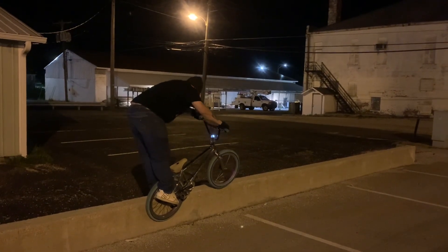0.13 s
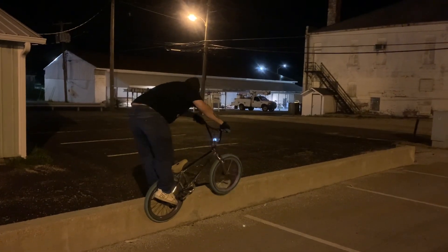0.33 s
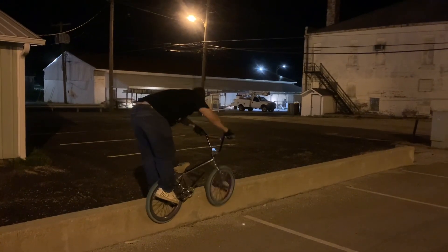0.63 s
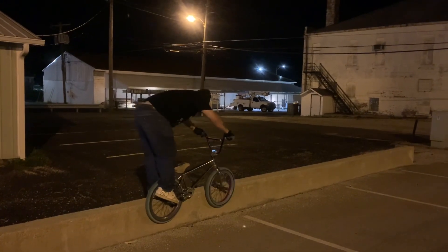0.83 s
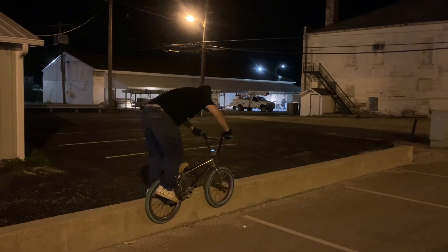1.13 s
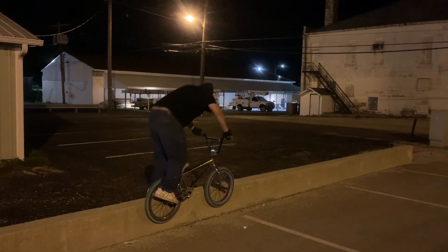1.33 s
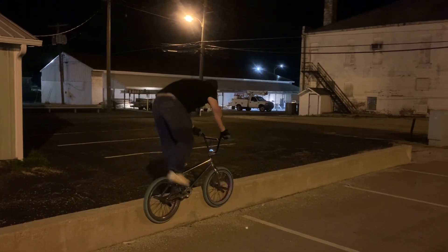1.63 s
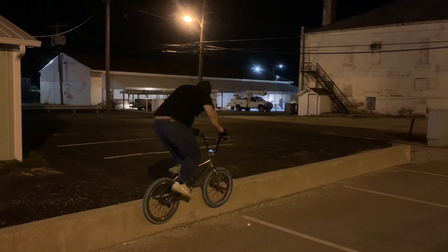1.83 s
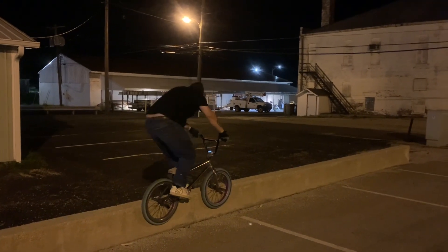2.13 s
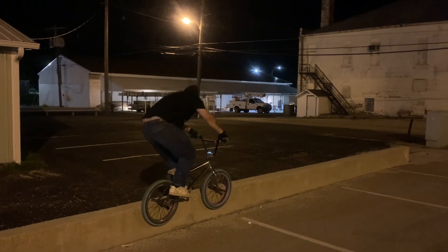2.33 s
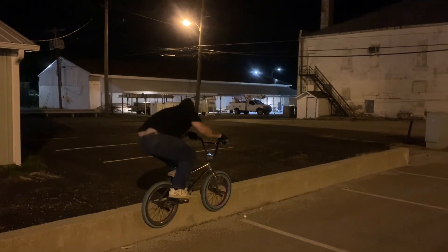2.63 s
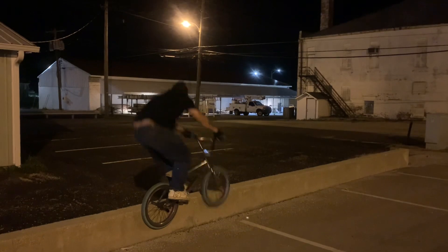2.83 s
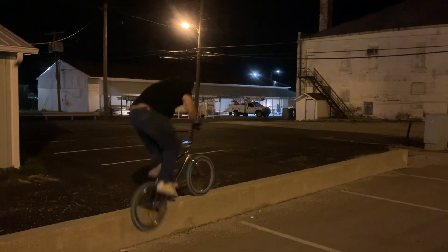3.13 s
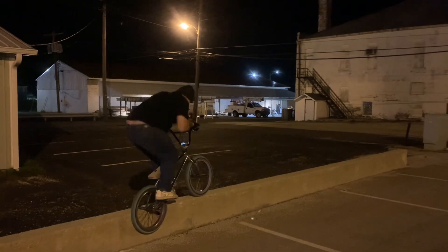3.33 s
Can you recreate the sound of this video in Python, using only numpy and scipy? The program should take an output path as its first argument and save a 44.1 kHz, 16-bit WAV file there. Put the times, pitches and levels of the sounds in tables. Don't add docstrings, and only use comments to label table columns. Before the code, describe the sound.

A small steel bike hops on a concrete curb outdoors at night: a sharp double knock, smaller clacks, another crack, then a hard ringing landing. Close stereo microphone, faint building echoes, low distant traffic.

```python
import sys
import numpy as np
from scipy import signal
from scipy.fft import rfft, irfft, next_fast_len
from scipy.io import wavfile

SR = 44100
rng = np.random.default_rng(int(sys.argv[2]) if len(sys.argv) > 2 else 0)


def undo_db(level):
    steps = np.asarray(level, float) / 20
    return 10 ** steps


def output_pcm(signal):
    pcm = np.clip(np.atleast_2d(signal).T, -1, 1) * 32767
    wavfile.write(sys.argv[1], SR, np.round(pcm).astype(np.int16))


N = 154350
T = np.arange(N) / SR


def clacks():
    # t/s, peak level/dB, pitch of the struck part f/Hz, rattle's time to fall 60 dB t60/s
    clack_events = [(0.0928, -58.5, 2230, 0.024), (0.5756, -33, 2530, 0.012), (0.5887, -28, 2440, 0.072),
                    (0.6695, -23.5, 2330, 0.042), (0.6754, -33, 2340, 0.035), (0.7057, -37, 2100, 0.09),
                    (0.7464, -55.5, 2060, 0.057), (0.778, -49, 2090, 0.012), (0.894, -45.5, 10900, 0.032),
                    (0.9244, -30, 9170, 0.027), (0.9552, -50.5, 3630, 0.043), (1.1895, -51.5, 10500, 0.26),
                    (1.365, -51.5, 1980, 0.17), (1.4615, -30.5, 2240, 0.029), (1.4794, -64, 1950, 0.054),
                    (1.5535, -46, 2170, 0.079), (1.587, -39, 9700, 0.07), (1.7144, -36.5, 10600, 0.042),
                    (1.724, -19.5, 10600, 0.0088), (1.7607, -34.5, 10900, 0.2),
                    (1.8593, -42.5, 11200, 0.047), (2.2044, -58.5, 1980, 0.034), (2.3375, -55, 2190, 0.06),
                    (2.7837, -58, 2220, 0.076), (2.9484, -42, 7350, 0.016), (3.0405, -29, 2540, 0.012),
                    (3.1223, -25.5, 2720, 0.017), (3.1567, -16.5, 10100, 0.083),
                    (3.1722, -13.5, 10600, 0.0078), (3.3404, -62, 2870, 0.05)]
    # f/Hz, level/dB
    crack_spectrum = [(600, -28), (1500, 2), (2500, 5.5), (4800, -1.5), (7000, -3), (10500, 3), (15000, -3),
                      (16000, -19)]
    crack, rattle, pings = np.zeros(N), np.zeros(N), np.zeros(N)
    for s, db, hz, t60 in clack_events:
        crack += undo_db(db - 2) * shape(s, attack=0.0012, hold=0.00055, t60=0.017)
        rattle += undo_db(db - 13.5) * shape(s, attack=0.003, hold=0.0088, t60=t60)
        ping_t60 = min(0.012, 69 / hz)
        pings += tap(s, db + 10, hz, ping_t60)
    noise = crack * rng.standard_normal(N) + rattle * grains()
    return colour(noise, crack_spectrum) + pings


def knocks():
    # t/s, peak level/dB, pitch f/Hz, time to fall 60 dB t60/s
    knock_events = [(0.575, -39, 740, 0.066), (0.67, -14, 1443, 0.02), (0.704, -37.5, 838, 0.041),
                    (0.735, -32.5, 1304, 0.058), (0.803, -52, 890, 0.068), (0.85, -46.5, 1440, 0.065),
                    (0.924, -39.5, 1174, 0.055), (1.46, -30.5, 1790, 0.11), (1.554, -39.5, 1390, 0.028),
                    (1.602, -32, 1480, 0.012), (1.7128, -27.5, 1170, 0.031), (1.724, -22.5, 817, 0.028),
                    (1.7605, -17.5, 1400, 0.008), (1.875, -41, 810, 0.019), (1.908, -53, 760, 0.04),
                    (2.337, -38, 1195, 0.033), (2.665, -44.5, 1390, 0.017), (2.843, -29, 1560, 0.019),
                    (3.04, -28.5, 1200, 0.011), (3.123, -22, 1280, 0.017), (3.157, -19, 1074, 0.019),
                    (3.171, -16.5, 780, 0.017), (3.199, -40, 740, 0.13), (0.576, -6, 2990, 0.014),
                    (0.591, -34, 2700, 0.017), (0.591, -44.5, 6270, 0.018), (0.605, -34.5, 2640, 0.023),
                    (0.7, -32.5, 4140, 0.045), (0.7, -38, 7450, 0.1), (0.716, -37, 2040, 0.045),
                    (0.75, -35, 2050, 0.064), (0.9255, -31, 6240, 0.018), (0.899, -55, 3870, 0.06),
                    (0.955, -32.5, 3580, .03), (1.47, -31, 2030, 0.088), (1.7255, -19, 6520, 0.02),
                    (1.726, -22.5, 2260, .015), (2.845, -39, 2490, .015), (2.866, -43.5, 2550, .02),
                    (2.951, -56, 6700, 0.11), (2.982, -51, 7000, .02), (3.339, -33, 2420, 0.024),
                    (3.358, -35, 2590, 0.037), (3.375, -45, 2300, .03), (3.215, -29, 1770, 0.033),
                    (3.185, -25, 1600, 0.044), (0.672, -26.5, 820, 0.026), (0.679, -24.5, 1640, 0.024),
                    (1.49, -40, 2050, 0.25), (0.669, -24.5, 6360, 0.016), (0.5765, -40, 3570, .012),
                    (1.731, -25.5, 400, 0.015), (0.896, -37, 11050, 0.028)]
    total = np.zeros(N)
    for s, db, hz, t60 in knock_events:
        total += shape(s, attack=1.6 / hz, hold=1, t60=1) * tap(s, db + 2, hz, t60)
    return total


def landing():
    # f/Hz, level/dB, time to fall 60 dB t60/s
    tube_modes = [(2941, -2.5, .42), (6972, -4, .27), (7316, -7, .26), (7361, -14, .22), (8096, -20, .25),
                  (9189, -12, .33), (9269, -15, .3), (9986, -8, .08), (10534, -6, .2), (10605, -15, .2),
                  (10800, -10, .12), (12250, -13, .15), (15257, -15, .15), (11094, -13, .12)]
    landing_s, landing_db = 3.173, -22
    click = np.zeros(N)
    click[int(landing_s * SR)] = undo_db(landing_db)
    total = np.zeros(N)
    for hz, db, t60 in tube_modes:
        swell = shape(landing_s, attack=(950 / hz) ** 2, hold=1, t60=1)
        waver = undo_db(db + 1.5 * drift(30))
        total += waver * swell * ring(click, hz, t60)
    return total


def thuds():
    # t/s, peak level/dB, pitch f/Hz, time to fall 60 dB t60/s
    thud_events = [(0.267, -32.5, 112.6, 0.3), (0.301, -25.5, 65, 0.11), (0.579, -29.5, 102.6, 0.12),
                   (0.671, -17.5, 248, 0.12), (.795, -45, 348, 0.49), (1.1, -38.5, 290, 0.12),
                   (1.727, -22.5, 205.2, 0.051), (1.954, -34, 69.4, 0.073), (2.422, -39.5, 117.4, 1),
                   (3.136, -25, 106.1, 0.31), (3.166, -24, 96.45, 0.57), (3.168, -20, 199.3, 0.22),
                   (3.158, -24, 306, 0.025), (.682, -29.5, 149.7, 0.16), (3.3, -43.5, 600, .2)]
    total = np.zeros(N)
    for s, db, hz, t60 in thud_events:
        phase = 2 * np.pi * hz * (T - s) + 0.58 * drift(37)
        boom = shape(s, attack=0.62 / hz, hold=0.85 / hz, t60=t60) * np.sin(phase)
        narrow = resonate(rng.standard_normal(N), hz, 0.3 * hz)
        dull = resonate(narrow, 0.37 * hz, 3.3 * hz)
        puff = 0.27 * shape(s, attack=0.017, hold=0.013, t60=0.17) * dull
        total += undo_db(db) * (boom + puff)
    return total


def scrapes():
    drag_starts = [.57, .668, .895, .95, 1.46, 1.705, 2.835, 2.945, 3.037, 3.157, .655, 1.697, 2.857, 2.78,
                   3.143, 1.44]
    # length/s, level/dB, time to fall 60 dB t60/s, colour f/Hz
    drags = [(0.0061, -41, 0.18, 2640), (0.034, -41.5, 0.089, 2470), (0.0082, -54, 0.09, 12000),
             (0.009, -61, 0.034, 3000), (0.01, -48, 0.2, 2050), (0.01, -51, 0.52, 750),
             (0.044, -45, 0.1, 2430), (0.01, -67, 0.52, 9400), (0.028, -36.5, 0.065, 1400),
             (0.0067, -32.5, 0.26, 1320), (0.022, -50, 0.031, 1200), (0.026, -54.5, .03, 830),
             (0.019, -51, 0.076, 2900), (0.018, -66, .06, 1700), (0.021, -57, .03, 980),
             (.02, -56.5, .05, 2200)]
    # f/Hz, level/dB
    scrub_spectrum = [(300, -6.5), (800, 7.5), (2300, 9.5), (3200, 11.5), (5000, -5.5), (7000, 0.5),
                      (10500, -2), (15500, -2.5)]
    rough = undo_db(3.72 * drift(47)) * (0.71 * grains() + 0.77 * rng.standard_normal(N))
    grit = colour(rough, scrub_spectrum)
    total = np.zeros(N)
    for s, (length, db, t60, hz) in zip(drag_starts, drags):
        coloured = grit + 0.8 * resonate(grit, hz, 0.22 * hz)
        total += undo_db(db) * shape(s, attack=0.006, hold=length, t60=t60) * coloured
    return total


def rolling():
    # t/s, level/dB
    roll_levels = [(0.0, -59), (0.6, -100.5), (0.74, -92), (0.8, -54), (0.95, -65), (1.23, -52),
                   (1.38, -49.5), (1.619, -53), (2.04, -63), (2.64, -75), (2.88, -49), (3.23, -81),
                   (3.359, -46.5), (3.5, -60)]
    # f/Hz, level/dB
    tread_spectrum = [(250, 9), (800, -7), (1400, -14), (2100, -7), (3200, -24), (5000, -19), (9000, -30.5),
                      (15500, -37)]
    s, db = np.transpose(roll_levels)
    loudness = undo_db(np.interp(T, s, db) + 1 + 0.3 * drift(61))
    return loudness * colour(rng.standard_normal(N), tread_spectrum)


def walls(x, cut_hz):
    t = T[:SR // 2]
    tail = rng.standard_normal(len(t)) * undo_db(-60 * t / 0.32)
    tail = tail * (t > 0.012)
    dull = signal.lfilter(*signal.butter(2, cut_hz, fs=SR), tail)
    return undo_db(-19.5) * signal.fftconvolve(x, dull / np.sqrt(np.sum(tail ** 2)))[:N]


def night():
    # t/s, level/dB
    traffic_levels = [(0.0, -61), (0.33, -63.5), (0.4, -66.5), (0.59, -65), (0.74, -59), (1.1, -62.5),
                      (1.299, -60.5), (2.59, -61), (3.321, -56.5), (3.5, -58.5)]
    # f/Hz, level/dB
    night_spectrum = [(28, -21.5), (50, -1), (120, 1.5), (250, -17.5), (600, -24.5), (1500, -36),
                      (3500, -55.5), (15500, -56)]
    s, db = np.transpose(traffic_levels)
    loudness = undo_db(np.interp(T, s, db) + 11 + 4.94 * drift(1.9))
    noise = colour(rng.standard_normal(N + SR), night_spectrum)[SR:]
    return loudness * noise


def tap(s, db, hz, t60):
    clicks = np.zeros(N)
    at = int(s * SR) + np.cumsum(rng.integers(1, 9, 5))
    clicks[at] = undo_db(db - 8) * rng.uniform(0.2, 1, 5)
    return ring(clicks, hz, t60)


def grains():
    sign = rng.choice([-1, 1], N)
    size = sign * undo_db(4.5 * np.minimum(rng.exponential(1, N), 4))
    clicks = rms_one(size * (rng.random(N) < 7300 / SR))
    return 0.5 * clicks + 0.85 * parts(clicks, count=26)


def parts(x, count):
    pitches = np.geomspace(1800, 15000, count) * rng.uniform(0.97, 1.03, count)
    total = np.zeros(len(x))
    for hz in pitches:
        total += undo_db(6 * drift(18)) * resonate(x, hz, 0.025 * hz) * np.sqrt(hz)
    return rms_one(total)


def ring(clicks, hz, t60):
    r = undo_db(-60 / (t60 * SR))
    w = 2 * np.pi * hz / SR
    return signal.lfilter([0, np.sin(w)], [1, -2 * r * np.cos(w), r * r], clicks + 1e-18)


def resonate(x, hz, width_hz):
    r = np.exp(-np.pi * width_hz / SR)
    w = 2 * np.pi * hz / SR
    return rms_one(signal.lfilter([1, 0, -1], [1, -2 * r * np.cos(w), r * r], x))


def shape(s, attack, hold, t60):
    rise = np.clip((T - s) / attack, 0, 1)
    falling_s = np.clip(T - s - hold, 0, None)
    return rise * undo_db(-60 * falling_s / max(t60, 1e-3))


def drift(rate):
    r = np.exp(-80 * np.pi * rate / SR)
    noise = rng.standard_normal(N // 40 + 2002)
    slow = signal.lfilter([1], [1, -2 * r, r * r], noise)[2000:]
    return np.interp(np.arange(N) / 40, np.arange(len(slow)), rms_one(slow))


def colour(x, spectrum):
    hz, db = np.transpose(spectrum)
    bins_hz = np.arange(2049) * SR / 4096
    gain = undo_db(np.interp(np.log(bins_hz + 1), np.log(hz), db))
    cep = irfft(np.log(gain))
    cep[1:2048] *= 2
    cep[2049:] = 0
    h = irfft(np.exp(rfft(cep)))
    return signal.fftconvolve(x, h / np.sqrt(np.sum(h ** 2)))[:len(x)]


def rms_one(x):
    return x / np.sqrt(np.mean(x ** 2) + 1e-20)


def scene():
    bike = clacks() + knocks() + scrapes() + rolling()
    both = bike + landing() + thuds() + night() + walls(bike, cut_hz=14000)
    ports = []
    for _ in range(2):
        own_echo = 1.53 * walls(bike, cut_hz=5800)
        own_night = signal.lfilter(*signal.butter(2, 9000, fs=SR), night())
        ports.append(both + own_echo + undo_db(1) * own_night)
    return np.array(ports)


def band_limit(x):
    return signal.sosfilt(signal.butter(12, 17000, fs=SR, output="sos"), x)


def record(dry):
    # f/Hz, phase/rad
    lead_low = [(60, -.1), (810, 12.4), (1050, 13.6), (3250, 15.6), (4100, 14.3), (5000, 15.7),
                (6300, 12.7)]
    # f/Hz, phase/rad
    lead_top = [(7700, 10.4), (9000, 9.0), (10600, 6.3), (12700, 3.7), (14000, 2.7), (15300, 0)]
    # f/Hz, level/dB
    left_favour = [(60, -0.5), (180, 0.0), (550, -1.0), (1650, -1.0), (4970, 0.0), (15000, 0.0)]
    size = next_fast_len(N + SR // 4)
    bins_hz = np.arange(size // 2 + 1) * SR / size
    hz, lead = np.transpose(list(lead_low) + list(lead_top))
    at, db = np.transpose(left_favour)
    gain = undo_db(-np.interp(bins_hz, at, db))
    lag = np.exp(-1j * np.interp(bins_hz, hz, lead))
    right = irfft(rfft(dry[1], size) * gain * lag, size)[:N]
    ports = np.array([dry[0], right])
    top_cut = signal.cheby2(10, 50, 16500, fs=SR, output="sos")
    rumble_cut = signal.butter(2, 30, "high", fs=SR, output="sos")
    mix = signal.sosfilt(rumble_cut, signal.sosfilt(top_cut, ports))
    return band_limit(mix)


dry = scene()
out = record(dry)
output_pcm(out)
```